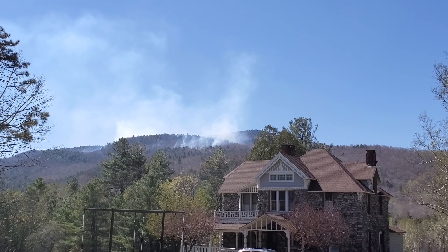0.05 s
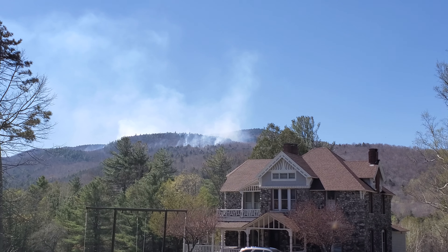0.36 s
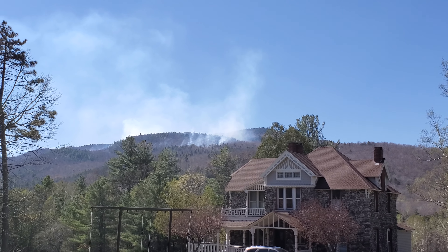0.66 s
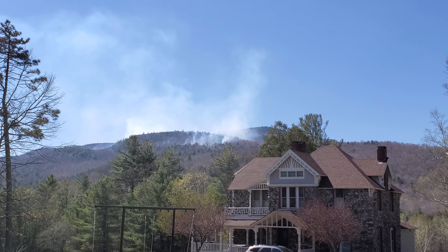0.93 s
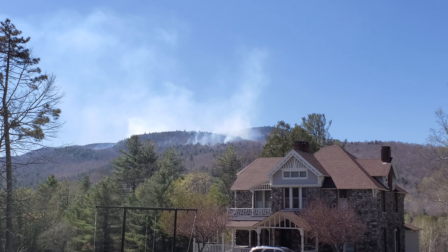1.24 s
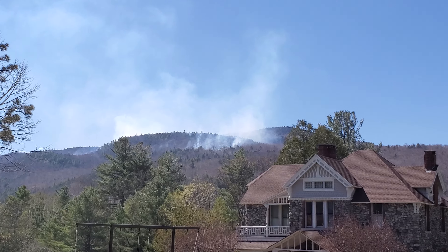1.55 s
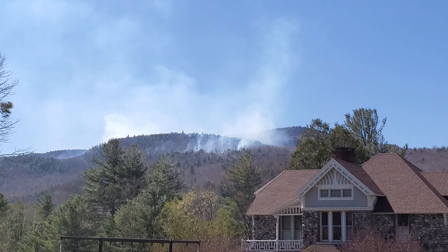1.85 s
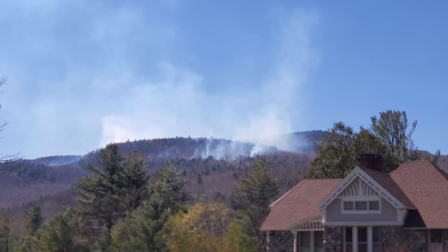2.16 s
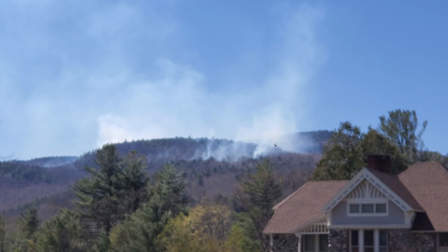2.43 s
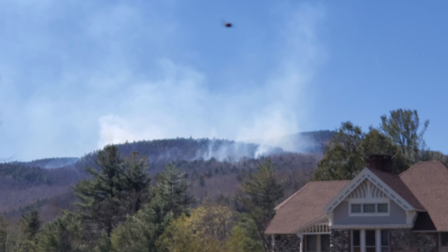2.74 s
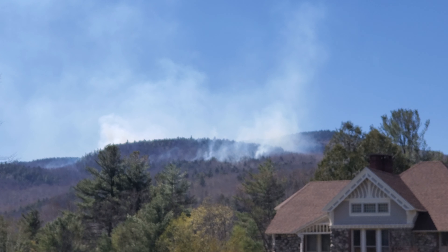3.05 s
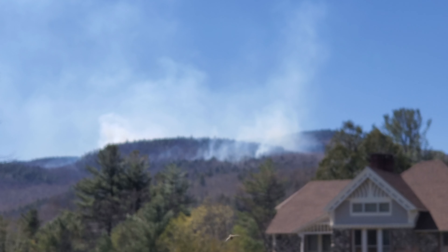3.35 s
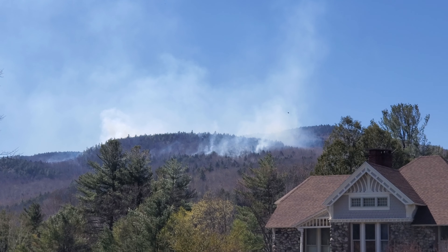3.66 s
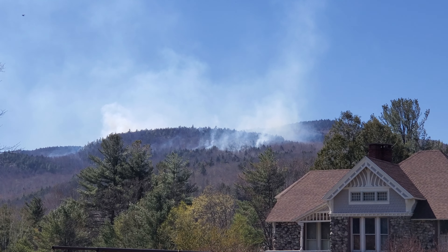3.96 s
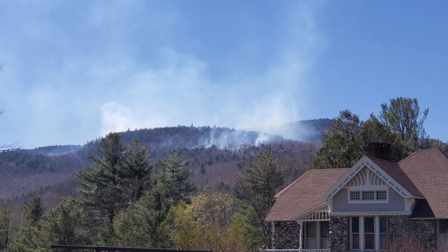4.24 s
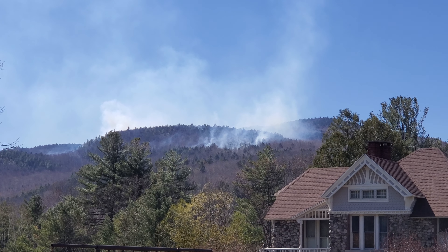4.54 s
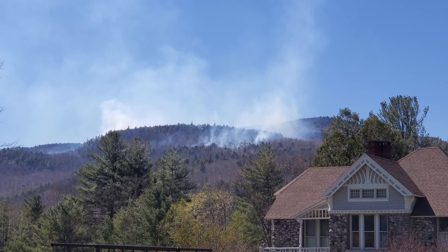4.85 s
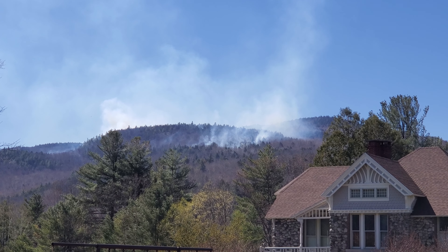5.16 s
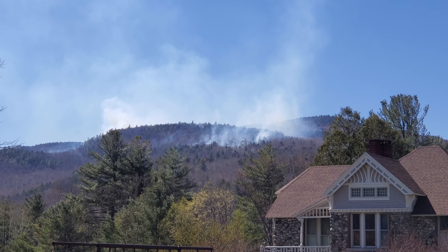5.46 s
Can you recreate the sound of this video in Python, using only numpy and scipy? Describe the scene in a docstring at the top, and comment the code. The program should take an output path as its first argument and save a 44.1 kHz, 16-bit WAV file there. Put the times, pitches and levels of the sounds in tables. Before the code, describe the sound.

On a calm hillside, a phone microphone picks up faint far-off traffic, a low engine hum and its own soft hiss. Close gusts thump and flutter, shifting between left and right. Early on the hand makes the case click twice, and distant tyres recede. A quieter stretch follows with scattered puffs and slight rubbing, then the strongest wind buffets come at the end.

```python
"""Light wind rumbles in puffs on a hand-held phone's two microphone ports, out on a quiet hillside.
Far off, a road rushes, one vehicle's tyres fade away and an engine drones, over the microphones' own hiss.
Close up, eddies buffet each port separately, hardest near the end, and the hand makes the case
click twice and rubs on it."""
import sys
import numpy as np
from scipy import signal
from scipy.fft import rfft, irfft
from scipy.io import wavfile

SR = 44100
rng = np.random.default_rng(int(sys.argv[2]) if len(sys.argv) > 2 else 0)


def persist_wave(psi):
    """Save psi, clipped to +-1, as 16-bit WAV."""
    counts = np.round(np.clip(psi, -1, 1) * 32767).astype(np.int16)
    wavfile.write(sys.argv[1], SR, np.atleast_2d(counts).T)


N = 251370
TIME = np.arange(N) / SR
FREQ = np.maximum(np.arange(N // 2 + 1) * SR / N, 1)
TOP_HZ = 15750  # upper limit of the phone


def undb(db):
    """Decibels to gain."""
    return 10 ** (np.asarray(db) / 20)


def unit(x):
    """Scale to rms 1."""
    return x / np.sqrt(np.mean(x ** 2))


def noise(points):
    """Noise whose density follows points of f/Hz, level/dB per Hz."""
    hz, db = np.transpose(points)
    density = undb(np.interp(np.log(FREQ), np.log(hz), db))
    return irfft(rfft(rng.standard_normal(N)) * density, N) * np.sqrt(SR / 2)


def band(hz, width_hz):
    """Noise in one steep-sided band, rms 1."""
    detuning = (FREQ - hz ** 2 / FREQ) / width_hz
    return unit(irfft(rfft(rng.standard_normal(N)) / (1 + detuning ** 4), N))


def walk(rate):
    """A smooth random drift, rms 1, that changes about rate times a second."""
    return unit(irfft(rfft(rng.standard_normal(N)) * np.exp(-(FREQ / (rate + 1)) ** 2), N))


def swell(s, length):
    """A bell-shaped envelope around time s."""
    return np.exp(-2 * ((TIME - s) / length) ** 2)


def flicker(x, db, rate, count=14):
    """Let overlapping bands of a sound waver in level, each on its own."""
    place = np.interp(np.log(FREQ), np.log([250, TOP_HZ]), [0, count - 1])
    spectrum = rfft(x)
    bands = (irfft(spectrum * np.maximum(1 - np.abs(place - k), 0), N) for k in range(count))
    return sum(part * undb(db * walk(rate)) for part in bands)


def hiss(sheen_hz=11000, dull_db=-1.5, bright_db=3, brightens_s=2.83, rise_s=0.44):
    """Each microphone has its own flickering hiss; the left has a thin whistle and a top that brightens."""
    # self-noise of each microphone: f/Hz, level/dB per Hz
    left_floor = [(500, -87), (1400, -92), (2200, -98.5), (3000, -105), (4000, -104), (4700, -95.5),
                  (6900, -96), (7500, -104), (8300, -100.5), (9200, -90), (10200, -91.5), (11600, -98.5),
                  (13600, -92.5), (15500, -100)]
    right_floor = [(500, -100), (2100, -100), (3500, -94.5), (3900, -101), (4900, -100.5), (5300, -104.5),
                   (7200, -105), (8100, -110), (9000, -106), (10400, -115), (11800, -111), (15000, -126)]
    left, right = noise(left_floor), noise(right_floor)
    top = irfft(rfft(left) / (1 + (sheen_hz / FREQ) ** 20), N)
    risen = np.clip((TIME - brightens_s) / rise_s + .5, 0, 1)
    top_gain = undb(dull_db + (bright_db - dull_db) * risen)
    whistle = band(hz=9260, width_hz=80) * undb(-75.0 + 4.9 * walk(5))
    left = left + top * (top_gain - 1) + whistle
    return np.array([flicker(side, db=1.55, rate=25.5) for side in (left, right)])


def far_road(tyre_db=-53.5, leaves_s=0.97, fade_db_per_s=13.5, remainder_db=-68.5):
    """Traffic rushes far off and one vehicle's tyres recede; moving air makes each band waver."""
    # steady rush of far traffic and trees: f/Hz, relative level/dB per Hz
    rush_spectrum = [(20, -14), (40, 8.5), (75, 9.5), (120, 9.5), (175, -5.5), (225, 0.5), (257, -5),
                     (295, 0.5), (440, -5.5), (660, -5), (850, -8.5), (1200, -9.5), (1550, -13.5),
                     (2100, -18), (3500, -29.5), (6000, -43.5)]
    # tyres of the receding vehicle: f/Hz, relative level/dB per Hz
    tyre_spectrum = [(400, -8), (530, 7.5), (850, 2), (1020, 7.5), (1230, 9), (1430, 2), (1750, 3.5),
                     (2200, -6.5), (3500, -17), (6000, -46)]
    # traffic swelling in a hollow band: t/s, length/s, level/dB
    swells = [(.55, 1.5, -60.5), (2.15, 1.12, -58), (5.15, 1.8, -63.5)]
    rush = unit(noise(rush_spectrum)) * undb(-49.0)
    tyre_gain = undb(tyre_db - fade_db_per_s * np.maximum(TIME - leaves_s, 0))
    tyres = unit(noise(tyre_spectrum)) * np.hypot(tyre_gain, undb(remainder_db))
    hollow_gain = np.sqrt(sum((undb(db) * swell(s, length)) ** 2 for s, length, db in swells))
    hollow = band(hz=755, width_hz=266) * hollow_gain
    return flicker(rush + tyres + hollow, db=1.44, rate=9.9)


def far_engine(firing_hz=39.2):
    """A distant engine drones at a wandering pitch; moving air fades each harmonic on its own."""
    # lines of the drone: multiple of the firing rate, level/dB
    harmonics = [(2, -52), (3, -66), (4, -61)]
    firings = np.cumsum(firing_hz * (1 + 0.013 * walk(4.3))) / SR
    return sum(unit(np.sin(2 * np.pi * k * firings) * undb(5.8 * walk(32.0))) * undb(db)
               for k, db in harmonics)


def from_right(x, right_db):
    """A far sound reaches the right port first, then bends round the phone to the left one."""
    # lag at the left port: f/Hz, delay/ms
    port_lag = [(300, 0.2), (520, 0.31), (800, 0.31), (1200, 0.24), (1600, 0.317), (1950, 0.31),
                (2350, 0.38), (3500, 0.15), (4900, 0.153)]
    lag_s = np.interp(FREQ, *np.transpose(port_lag)) / 1000
    left = irfft(rfft(x) * np.exp(-2j * np.pi * FREQ * lag_s), N)
    return np.array([left, x * undb(right_db)])


def handling():
    """The case clicks next to the right port and rings briefly; fingers slide on it."""
    # clicks: t/s, right peak/dB, left relative to right/dB, tilt of the ring/dB per octave
    clicks = [(0.3597, -18, -28, 0.5), (1.128, -34, -23, 11)]
    # modes of the case: f/Hz, t60/s, relative level/dB
    case_modes = [(567, 0.018, -2), (1020, 0.011, 1.5), (1170, 0.0046, 2.5), (2090, 0.0021, -1.5),
                  (2900, 0.003, 1), (3400, 0.007, -5.5), (4540, 0.0012, -6.5), (6100, 0.0035, -20)]
    # finger slides: t/s, length/s, centre/Hz, width/Hz, left level/dB, right level/dB
    rubs = [(0.371, 0.014, 3200, 2980, -71, -47), (0.3727, 0.007, 1990, 795, -61, -44.5),
            (1.123, .012, 1290, 1400, -56, -55), (1.835, 0.017, 6350, 1900, -53, -63),
            (1.837, 0.017, 11100, 4030, -53.5, -75), (2.925, 0.085, 2880, 2000, -84, -59)]
    out = np.zeros((2, N))
    for s, db, left_db, tilt_db in clicks:
        age = np.maximum(TIME - s, 0)
        ring = np.zeros(N)
        for k, (hz, t60, mode_db) in enumerate(case_modes):
            gain = undb(mode_db + tilt_db * np.log2(hz))  # a lighter, harder contact favours high modes
            ring += (-1) ** k * gain * np.sin(2 * np.pi * hz * age) * undb(-60 * age / t60)
        out += np.outer(undb([db + left_db, db]), ring / np.abs(ring).max())
    for s, length, hz, width_hz, left_db, right_db in rubs:
        out += np.outer(undb([left_db, right_db]), band(hz, width_hz) * swell(s, length))
    return out


def wind(calm_db=-62):
    """Gusts swell and die away on the phone; each port has its own turbulence, in quick puffs."""
    # gusts: t/s, length/s, level/dB, left minus right/dB
    gusts = [(0.08, 0.51, -39, 4.5), (0.833, 0.33, -39.5, -2.5), (1.426, 0.39, -49, -4),
             (2.398, 0.13, -43, 11), (3.15, 0.73, -51.5, 0), (4.047, 0.14, -49.5, 14),
             (4.473, 0.34, -43.5, -11.5), (5.14, 0.68, -37, -4.5), (5.63, 0.28, -40, 12)]
    # turbulence at a port: f/Hz, relative level/dB per Hz
    turbulence = [(15, -53), (28, -16), (42, -9.5), (62, -1.5), (85, -4.5), (115, -8.5), (160, -17.5),
                  (240, -28.5), (400, -43), (900, -90), (2500, -76)]
    power = undb(calm_db) ** 2
    for s, length, db, pan_db in gusts:
        port_gains = undb([db + pan_db / 2, db - pan_db / 2])
        power = power + np.outer(port_gains, swell(s, length)) ** 2
    return np.array([unit(noise(turbulence) * undb(3.0 * walk(27))) * gain for gain in np.sqrt(power)])


def eddies(swing_hz=90, length_s=.02, rough=0.62, break_hz=280, tilt_db=-3.5):
    """An eddy swings the pressure on one port a few times; a sharper one breaks up into flutter."""
    # the strongest eddies: t/s, peak/dB, upper reach of the flutter/Hz, port (0 left, 1 right)
    buffets = [(.018, -27, 176, 1), (0.172, -26.5, 200, 0), (.653, -30.5, 130, 0), (2.434, -26.5, 189, 0),
               (2.923, -26.5, 170, 0), (2.997, -29, 130, 0), (4.56, -24.5, 340, 1), (4.852, -21.5, 150, 0),
               (4.925, -23.5, 190, 1), (5.163, -20, 220, 1), (5.272, -19, 560, 1), (5.402, -21, 273, 0)]
    out = np.zeros((2, N))
    for s, db, reach_hz, port in buffets:
        hz = swing_hz * np.exp(.1 * rng.standard_normal())
        swing = np.sin(2 * np.pi * (hz * TIME + rng.random()))
        slope = undb(tilt_db * np.log2(FREQ / swing_hz))
        colour = slope / (1 + (swing_hz / FREQ) ** 6) / (1 + (FREQ / reach_hz) ** 6)
        flutter = irfft(rfft(rng.standard_normal(N)) * colour, N)
        shape = swell(s, length_s)
        breakup = rough * min(reach_hz / break_hz, 1)
        puff = unit(swing * shape) + breakup * unit(flutter * shape)
        out[port] += puff / np.abs(puff).max() * undb(db)
    return out


def scene():
    """Road and engine far off to the right; wind and hand right on the phone, over its hiss."""
    distance = from_right(far_road() + far_engine(), right_db=0.5)
    return distance + wind() + eddies() + handling() + hiss()


def record(dry):
    """The phone cuts the top steeply."""
    return signal.sosfilt(signal.ellip(12, .1, 70, TOP_HZ, fs=SR, output="sos"), dry)


dry = scene()
out = record(dry)
persist_wave(out)
```